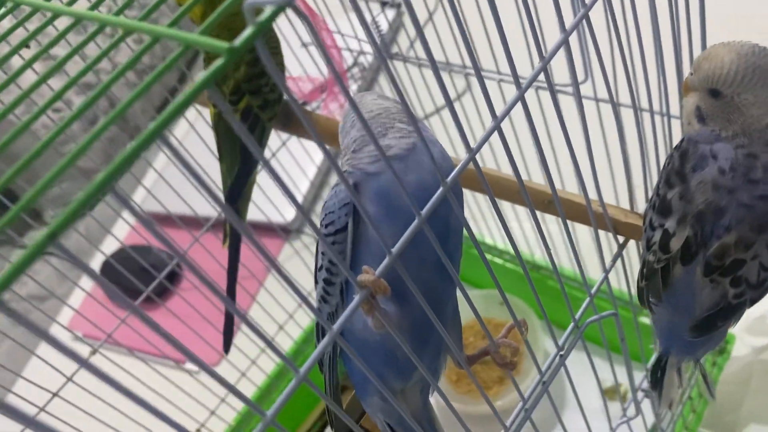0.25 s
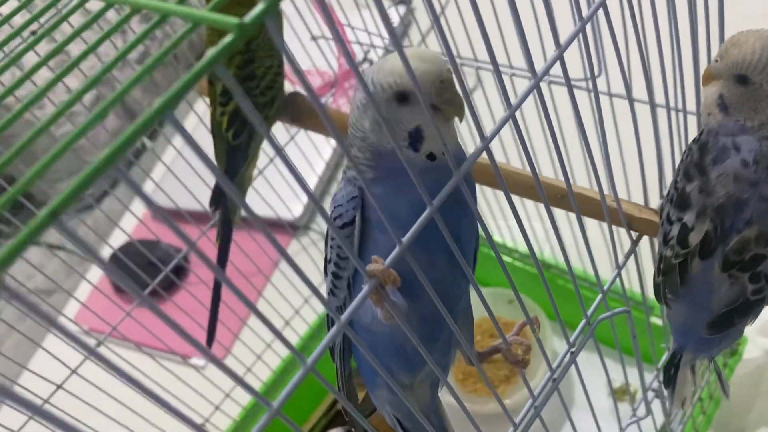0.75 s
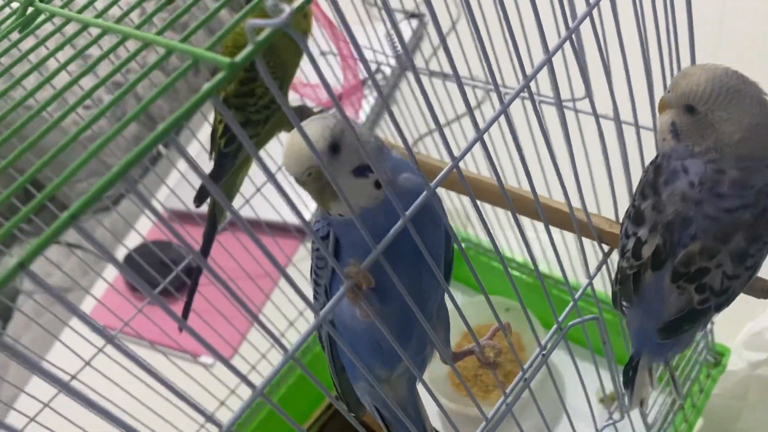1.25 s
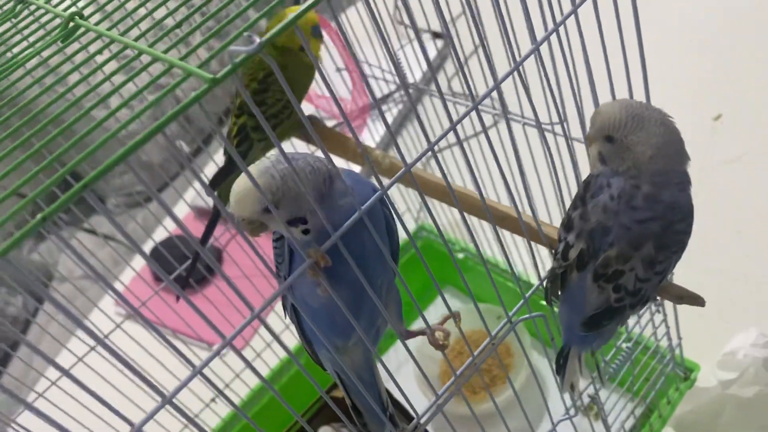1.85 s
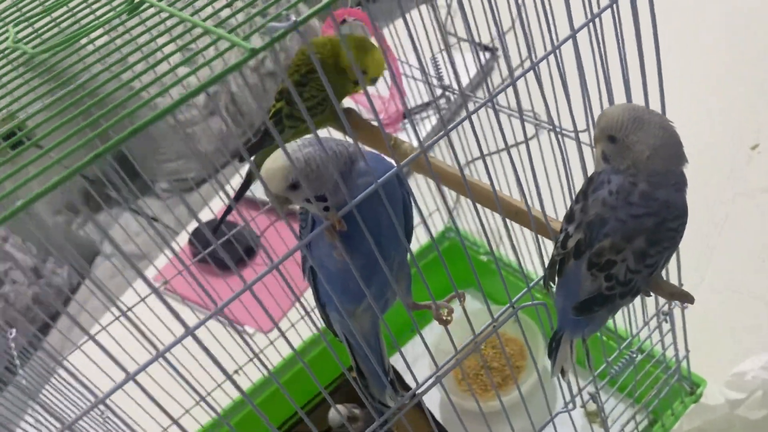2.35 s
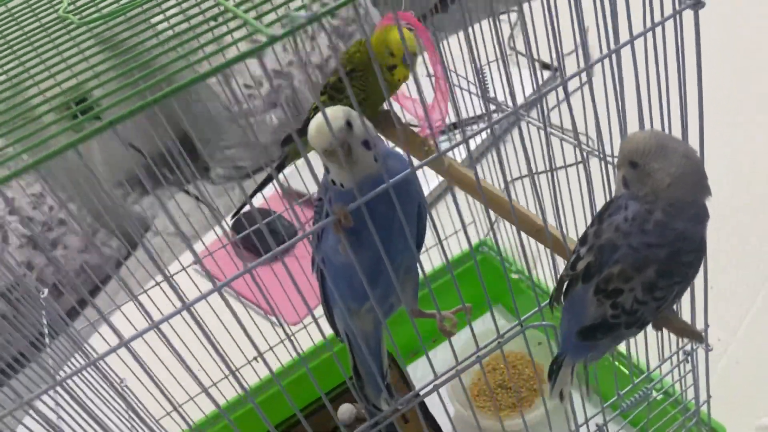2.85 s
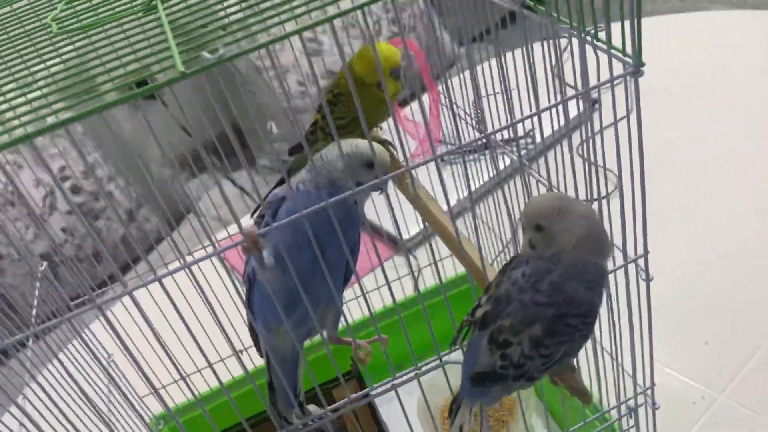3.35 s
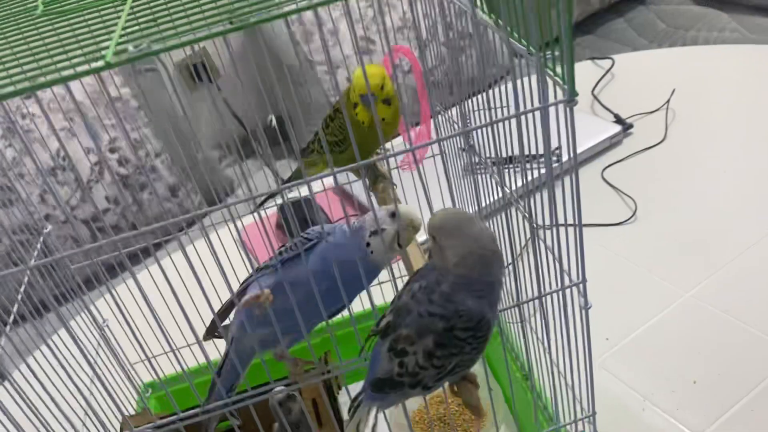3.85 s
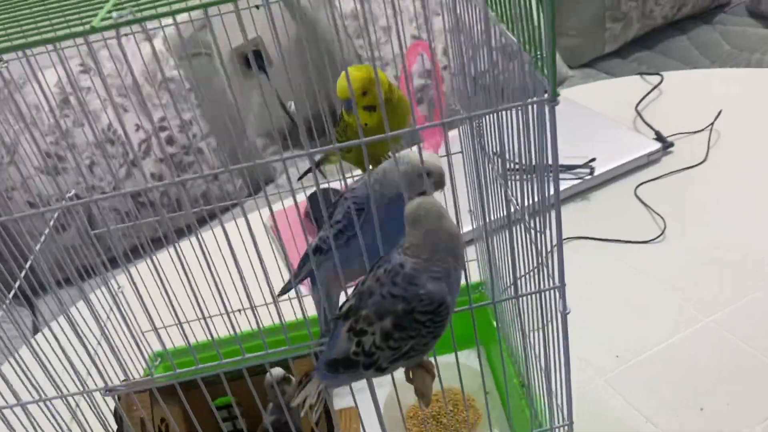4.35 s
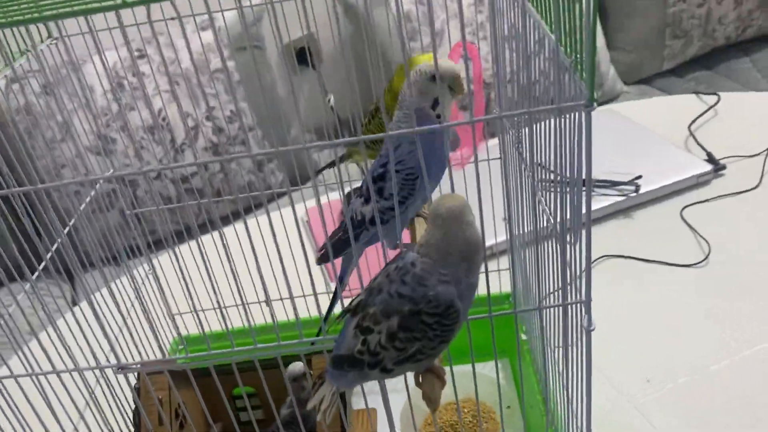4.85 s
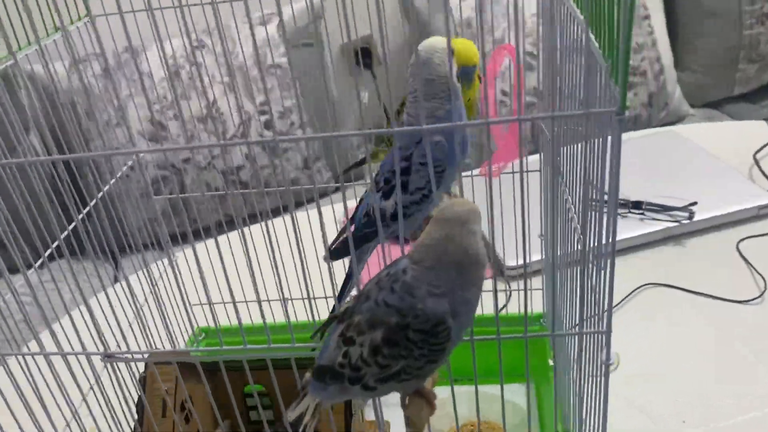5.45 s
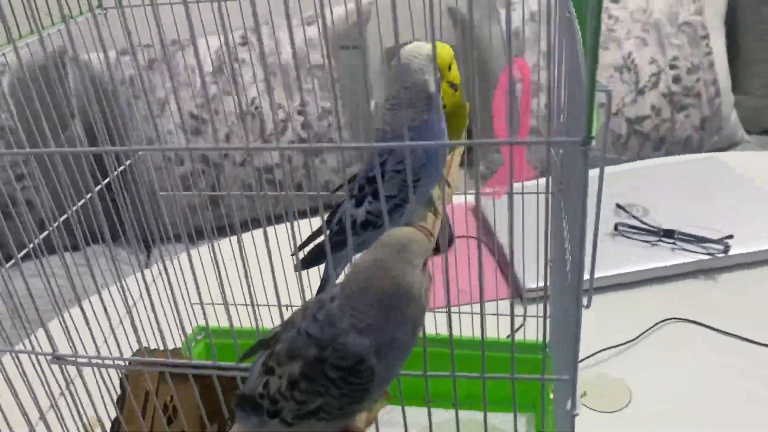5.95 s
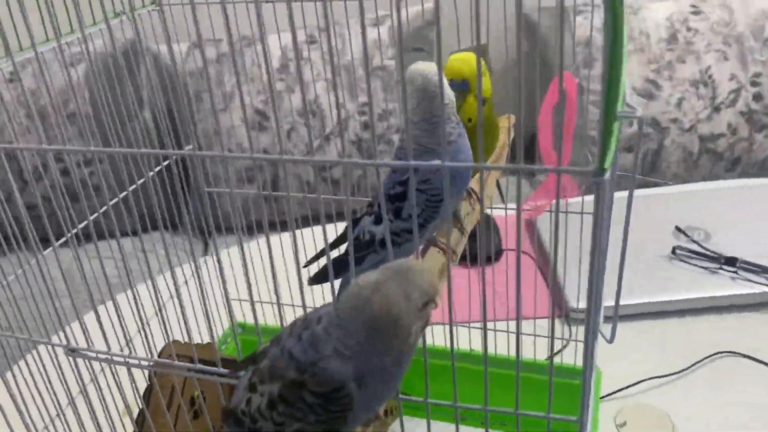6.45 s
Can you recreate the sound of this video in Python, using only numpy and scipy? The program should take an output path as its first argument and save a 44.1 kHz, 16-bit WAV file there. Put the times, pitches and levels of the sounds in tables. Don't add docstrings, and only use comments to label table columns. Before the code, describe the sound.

Budgerigars in a wire cage, heard close on a handheld phone. A tumble of short whistles is already under way, followed by hurried, level and loose chattering calls. After a quieter gap with a wooden knock, two bright tumbles lead to a soft warble and a run of rising chucks as handling rumble swells. A short call, late warble, rasps, beak scraping and a final tick follow in a softly ringing room.

```python
import sys
import numpy as np
from scipy import signal
from scipy.fft import rfft, irfft
from scipy.io import wavfile
from scipy.ndimage import uniform_filter1d

SR = 44100
rng = np.random.default_rng(int(sys.argv[2]) if len(sys.argv) > 2 else 0)


def boost(x):
    u = np.asarray(x, float) / 20
    return 10 ** u


def transcribe(signal):
    frames = np.atleast_2d(signal).T
    limited = np.clip(frames, -1, 1)
    pcm = np.round(limited * 32767).astype(np.int16)
    wavfile.write(sys.argv[1], SR, pcm)


N = 295470
T = np.arange(N) / SR


def band(x, hz, width_hz, order=2):
    lo = np.sqrt(hz ** 2 + width_hz ** 2 / 4) - width_hz / 2
    hi = min(lo + width_hz, .45 * SR)
    return signal.sosfilt(signal.butter(order, [lo, hi], "band", fs=SR, output="sos"), x)


def unit(x):
    return x / np.sqrt(np.mean(x ** 2))


def walk(rate):
    k = int(SR / rate)
    steps = np.repeat(rng.standard_normal(N // k + 1), k)
    return unit(uniform_filter1d(uniform_filter1d(steps, k), k)[:N])


def add(out, s, x):
    i = int(np.clip(s * SR, 0, N - 1))
    out[i:i + len(x)] += x[:N - i]


def swell(t, rise, fall):
    u = (np.arange(len(t)) + .5) / len(t)
    return np.sin(np.pi / 2 * np.clip(np.minimum(u / rise, (1 - u) / fall), 0, 1)) ** 2


def background():
    # frequency in Hz, level in dB per Hz
    air_colour = [(20, -12.0), (60, -2), (130, -4.5), (250, -7.5), (600, -9), (1000, -8.5), (3000, -31),
                  (6000, -46), (11000, -51)]
    # time in seconds, level in dB over rest
    stirring = [(0, 2), (2.25, 4), (2.9, 3), (3.3, 7.5), (3.62, 8.5), (3.8, 18.5), (4.1, 17.5), (4.5, 10.5),
                (5.2, 2), (5.6, 6), (6.0, 3.5), (6.3, 9.5), (6.7, 3.5)]
    # start in seconds, length in seconds, centre in Hz, level in dB
    drone_rows = [
        (4.14, 1, 603, -69.5),
    ]
    # frequency in Hz, level in dB
    mains_lines = [(60, -85.5), (118, -86.5)]

    stir = np.interp(T, *np.transpose(stirring))
    f = np.fft.rfftfreq(N, 1 / SR) + 1
    hz, db = np.transpose(air_colour)
    colour = boost(np.interp(np.log(f), np.log(hz), db))
    mid, side = irfft(rfft(rng.standard_normal((2, N))) * colour, N)
    air = mid + np.array([[.4], [-.4]]) * side
    rumble = unit(band(air, 120, 260)) * boost(-78 + stir + 1.9 * walk(7.1))
    hum = unit(band(air, 422.2, 700)) * boost(-78 + stir + 0.91 * walk(8.5))
    hiss = unit(band(air, 3000, 8100)) * boost(-77 + walk(5.6))
    rustle = unit(band(rng.standard_normal((2, N)), 2200, 5500, order=3))
    rustle *= boost(-89 + 1.15 * stir + 2.1 * walk(49))

    (s, length, hz, db), = drone_rows
    drone, t = np.zeros(N), np.arange(0, length, 1 / SR)
    add(drone, s, boost(db) * swell(t, 0.016, 0.89))
    drone *= unit(band(rng.standard_normal(N), hz, 30))
    mains = sum(boost(db + 2.0 * walk(2.4)) * np.sin(2 * np.pi * hz * T) for hz, db in mains_lines)
    microphone_hiss = boost(-97) * unit(band(rng.standard_normal((2, N)), 7500, 6000))
    return rumble + hum + hiss + rustle + drone + mains + microphone_hiss


def thumps():
    # start in seconds, peak in dB, frequency in Hz
    bumps = [
        (3.58, -55.5, 54.6),
        (3.76, -54.5, 179),
        (3.821, -49.5, 105),
        (4.02, -52.5, 65),
        (4.03, -54.5, 154),
    ]
    out = np.zeros(N)
    for s, db, hz in bumps:
        t = np.arange(0, 5.5 / hz, 1 / SR)
        add(out, s, boost(db) * swell(t, 0.28, 0.63) * np.sin(2 * np.pi * hz * t))
    return out


def ticks():
    # start in seconds, peak in dB, ring in Hz, time to fade by 60 dB in seconds
    wood = [
        (0.891, -49.5, 554, 0.012),
        (2.233, -28.5, 545, 0.028),
        (2.261, -61, 547, 0.022),
        (5.986, -49.5, 520, 0.015),
        (6.571, -44, 864, 0.022),
    ]
    # start in seconds, peak in dB
    wire = [
        (0.1672, -44),
        (2.4134, -48),
        (2.4224, -43),
        (2.6437, -45.5),
        (3.448, -38.5),
        (6.5727, -37),
    ]
    # start in
    # seconds, peak in dB
    clicked = [(5.740, -51), (5.745, -50), (5.751, -52), (5.757, -47), (5.764, -48), (5.880, -52.5),
               (5.884, -53), (5.889, -46), (5.902, -54), (5.908, -51), (5.914, -52), (5.919, -45),
               (5.925, -38.5), (5.931, -53), (5.934, -45.5), (5.938, -53), (5.942, -42), (5.946, -53)]
    out, t = np.zeros(N), T[:2000]
    for s, db, hz, t60 in wood:
        ring = np.sin(2 * np.pi * hz * t) * np.exp(-np.log(1000) * t / t60)
        add(out, s, boost(db) * ring * (1 - np.exp(-t / 0.001)))
    for s, db in wire:
        crack = rng.standard_normal(len(t)) * np.exp(-t / 0.00061)
        add(out, s, boost(db) * band(crack, 1600, 4900))
    for s, db in clicked:
        rub = (t == 0) + 0.18 * rng.standard_normal(len(t)) * np.exp(-t / 0.0021)
        bright = boost(-13) * band(rub, 3200, 2600, order=3)
        add(out, s, boost(db + 20) * (band(rub, 1100, 1400) + bright))
    return out


def rasps():
    # start in seconds, length in
    # seconds, pulses a second, centre pitch in Hz, level in dB
    bursting = [(2.419, 0.022, 1600, 3010, -64), (5.408, 0.089, 250, 4160, -55.5),
                (5.5, 0.44, 830, 352, -65.5), (5.556, 0.074, 640, 1635, -43),
                (5.559, 0.041, 400, 3983, -47.5), (5.624, 0.071, 260, 2130, -46),
                (6.07, 0.15, 1100, 1287, -66.5), (6.364, 0.03, 1700, 3930, -34),
                (6.365, 0.035, 1400, 1410, -40), (6.368, 0.011, 1700, 7950, -48),
                (5.558, 0.021, 900, 6420, -53)]
    swelling = [
        (0.46, 0.12, 654, 290, -69),
        (1.5, 0.061, 510, 4060, -55),
        (1.8423, 0.036, 420, 4480, -42),
        (4.706, 0.028, 859, 4850, -46.5),
        (4.695, 0.032, 740, 8000, -55.5),
        (2.69, 0.039, 2000, 8600, -61),
        (5.885, 0.16, 260, 1670, -64.5),
        (6.12, 0.34, 2000, 3900, -81.5),
    ]
    rows = [(*r, 0.14) for r in bursting] + [(*r, 0.29) for r in swelling]
    out = np.zeros(N)
    for s, length, rate, hz, db, peak in rows:
        t = np.arange(0, length, 1 / SR)[:SR // 3]
        chance = rng.standard_normal((900, 2))
        at = (np.cumsum(np.exp(0.5 * chance[:, 0])) - .6) * SR / rate
        inside = at < len(t)
        starts = np.zeros(len(t))
        starts[at[inside].astype(int)] = boost(2.2 * chance[inside, 1])
        gate = 0.11 + signal.lfilter([1], [1, -np.exp(-1 / (0.00079 * SR))], starts)
        puffs = gate * rng.standard_normal(len(t)) * swell(t, peak, 1 - peak) ** 0.59
        throat = band(np.pad(puffs, (0, 400)), hz, np.minimum(1.3 * hz, 2700), order=3)
        add(out, s, boost(db) * unit(throat))
    return out


def whistle(hz, over_db, step_db, third_db=0):
    phase = 2 * np.pi * np.cumsum(hz) / SR
    tone = np.sin(phase)
    for k in range(2, 6):
        overtone = boost(over_db + step_db * (k - 1) + third_db * (k == 3))
        tone += overtone * (k * hz < 10500) * np.sin(k * phase + k)
    return np.sqrt(2) * tone


def chucks():
    # start in seconds, peak in dB, top pitch in Hz, length in seconds, overtones in dB
    rising = [(3.777, -44, 1500, 0.0077, -27), (3.831, -38, 2252, 0.0091, -3),
              (3.881, -48.5, 1980, 0.0083, -1.5), (3.935, -39.5, 2206, 0.014, -2.5),
              (3.993, -39.5, 1950, 0.011, -4.5), (4.048, -35.5, 2293, 0.023, -4.5),
              (4.111, -44, 2440, 0.014, -4.5), (4.169, -38.5, 2076, .012, -4.5),
              (4.235, -39, 2140, 0.01, 3), (4.315, -34, 2370, 0.0127, -3), (4.38, -40.5, 2240, 0.0129, -2),
              (4.462, -40.5, 2200, 0.012, -4)]
    from_hz = 440
    out, snap = np.zeros(N), np.zeros(N)
    for s, db, top_hz, length, over_db in rising:
        t = np.arange(0, length, 1 / SR)
        risen = np.minimum(np.maximum(t / 0.011, t / length), 1)
        hz = top_hz - (top_hz - from_hz) * (1 - risen) ** 1.3
        add(out, s, boost(db) * swell(t, 0.25, 0.38) * whistle(hz, over_db, step_db=-1.5))
        add(snap, s + 0.0021, boost(db - 17) * np.exp(-t / .004))
    out = out * (1 + 0.29 * walk(1200))
    snap = band(snap * rng.standard_normal(N), 8000, 7000)
    return band(out, 2010, 3270, order=3) + boost(-34.0) * out + snap


def note(length, path_hz, over_db, zigzag=0, turn=0):
    t = np.arange(0, length + 0.006, 1 / SR)
    hz = np.interp(t / t[-1], np.linspace(0, 1, len(path_hz)), path_hz)
    zigzag_hz = 174 * (1 + 0.14 * np.tanh(turn))
    hz *= 1 + zigzag * signal.sawtooth(2 * np.pi * (zigzag_hz * t + turn), .3)
    return swell(t, .0045 / t[-1], .004 / t[-1]) * whistle(hz, over_db, step_db=-8.0, third_db=0)


def strokes():
    # seconds after its start, length in seconds, from Hz, to Hz, level in dB
    tumble = [
        (-.007, 0.004, 2130, 1930, -6.5),
        (.003, 0.015, 3028, 3360, -1),
        (.023, 0.0075, 3217, 3130, -9.5),
        (.032, 0.014, 1606, 1814, 0.5),
        (.047, 0.008, 3650, 3410, -0.5),
        (.058, 0.0077, 2410, 2530, 1),
        (.067, 0.012, 2448, 2790, -2),
        (.062, 0.016, 1814, 1770, -10),
        (.09, 0.0045, 2014, 2050, 1.5),
        (.094, 0.014, 1580, 1162, -8.5),
    ]
    # start in seconds, level in dB, pitch factor, stretch, tilt in dB per kHz (head turn)
    sung = [
        (2.653, -40, 1.01, 1.013, -0.5),
        (3.037, -38, 1.02, 0.99, 3),
    ]
    # start in seconds, length in seconds, top Hz, end Hz, level in dB
    arches = [
        (3.406, 0.066, 4380, 4080, -67.5),
        (3.621, 0.041, 4160, 3570, -51),
        (5.183, 0.068, 4000, 3800, -67.5),
        (5.25, 0.0267, 1957, 1500, -67),
        (6.655, 0.043, 4010, 3080, -62),
    ]
    arch_shape = [.84, .97, 1.0, .97, .93, .88]
    # start in seconds, length in seconds, from Hz, to Hz, level in dB Loose
    # chatter, then from 3.635 s a short level call
    chatter = [(0.903, 0.027, 3400, 3348, -49), (0.944, 0.0091, 2787, 2610, -49),
               (0.956, 0.012, 2864, 2700, -45.5), (0.984, 0.0031, 2774, 2564, -41.5),
               (0.996, 0.0051, 2480, 2512, -42), (1.005, 0.0051, 2007, 2030, -43.5),
               (1.006, 0.0037, 4297, 3920, -43), (1.021, 0.0031, 5260, 5260, -33),
               (1.03, 0.0045, 3640, 3880, -44), (1.034, 0.006, 3740, 4030, -45),
               (1.04, 0.0064, 4130, 3660, -45.5), (1.05, 0.0064, 3280, 3194, -40),
               (1.113, 0.004, 4610, 4700, -46.5), (1.12, 0.0036, 4566, 4240, -41.5),
               (1.125, 0.0053, 4270, 3940, -42), (1.131, 0.007, 3300, 3270, -38),
               (1.147, 0.009, 3183, 3214, -47), (1.155, 0.0036, 3393, 3540, -43.5),
               (3.635, 0.027, 2524, 2565, -38.5), (3.669, 0.003, 3030, 2890, -40.5),
               (3.68, 0.016, 3126, 2683, -37), (3.691, 0.0025, 3370, 3054, -34),
               (3.694, 0.0052, 2914, 3114, -35.5), (3.697, 0.012, 2608, 2673, -34.5),
               (3.717, 0.014, 2975, 3174, -44.5), (3.725, 0.0025, 4850, 5007, -37),
               (3.728, 0.0027, 1730, 1870, -40), (3.732, 0.004, 1900, 2220, -41.5),
               (3.732, 0.0072, 3900, 4360, -44)]
    hurried = [(0.351, 0.009, 2775, 2370, -41.5), (0.382, 0.006, 2303, 2633, -42.5),
               (0.391, 0.014, 2740, 3270, -35.5), (0.408, 0.007, 2860, 3190, -33.5),
               (0.416, 0.003, 2480, 2163, -31), (0.421, 0.007, 2266, 2590, -31),
               (0.426, 0.0065, 2694, 3355, -30), (0.432, 0.014, 3450, 3526, -23.5),
               (0.455, 0.0074, 2190, 2370, -37), (0.459, 0.009, 2930, 3098, -33.5),
               (0.465, 0.0051, 1770, 1520, -32), (0.468, 0.008, 1533, 2060, -34),
               (0.476, 0.006, 3607, 3623, -22), (0.485, 0.0023, 2800, 3040, -25.5),
               (0.487, 0.0077, 2576, 2394, -27), (0.497, 0.0037, 2596, 2450, -33.5),
               (0.502, 0.006, 2642, 2520, -30), (0.53, 0.008, 1400, 1015, -42),
               (0.524, 0.0072, 1519, 1517, -33.5), (4.641, 0.009, 2093, 2185, -41.5),
               (4.653, 0.011, 3210, 3206, -41.5), (4.662, 0.011, 3220, 2945, -46),
               (4.683, 0.0064, 2094, 1690, -36), (4.69, 0.00302, 1690, 1880, -34.5),
               (4.693, 0.0034, 1610, 1840, -35.5), (4.7, 0.006, 3266, 3010, -33),
               (4.706, 0.0115, 2592, 2115, -37), (4.709, 0.0065, 4616, 4800, -36.5),
               (4.716, 0.0083, 4410, 4390, -39.5), (4.72, 0.008, 2297, 2527, -35),
               (4.733, 0.0028, 2332, 2570, -44), (4.74, 0.011, 3660, 3710, -44.5),
               (4.754, 0.00321, 1923, 1880, -42.5)]
    level_calls = [(0.678, 0.029, 2810, 2733, -38.5), (0.704, 0.009, 2903, 3084, -29.5),
                   (0.713, 0.0042, 3005, 2800, -28.5), (0.719, 0.013, 2790, 3103, -28.5),
                   (0.736, 0.007, 2885, 3036, -25.5), (0.744, 0.004, 3860, 3750, -27),
                   (0.76, 0.0038, 3870, 3530, -34), (0.774, 0.004, 3350, 3580, -27.5),
                   (0.781, 0.004, 2490, 2230, -37), (0.786, 0.004, 2580, 2660, -33.5),
                   (0.789, 0.014, 1890, 1870, -43.5), (0.79, 0.006, 3820, 3470, -34),
                   (0.804, 0.0034, 2650, 2670, -32.5), (1.748, 0.024, 2654, 2580, -41),
                   (1.772, 0.0057, 3057, 3310, -33.5), (1.776, 0.0074, 2550, 2710, -34.5),
                   (1.787, 0.004, 2690, 2860, -32.5), (1.797, 0.013, 3380, 2826, -35.5),
                   (1.808, 0.0024, 2900, 3200, -28), (1.818, 0.0035, 2900, 2800, -36),
                   (1.826, 0.008, 2670, 2790, -37.5), (1.838, 0.0063, 2720, 2580, -35),
                   (1.844, 0.0035, 3770, 3800, -29.5), (1.845, 0.004, 1970, 1920, -38.5),
                   (1.85, 0.0025, 3150, 3010, -37.5), (1.852, 0.0062, 2080, 1778, -38),
                   (1.857, 0.0023, 2960, 3130, -38.5), (1.859, 0.005, 4095, 3645, -36),
                   (1.862, 0.0039, 1361, 1290, -38.5), (1.863, 0.007, 3617, 3950, -39.5),
                   (1.867, 0.0031, 1360, 1100, -45), (1.868, 0.006, 2670, 2716, -42)]
    warble = [(3.461, 0.013, 4070, 3320, -58), (3.472, 0.0058, 3340, 3450, -54),
              (3.48, 0.0046, 3390, 3100, -58.5), (3.484, 0.0077, 3360, 3660, -56.5),
              (3.491, 0.0057, 4080, 4340, -55.5), (3.5, 0.011, 4480, 4100, -56.5),
              (3.509, 0.004, 4050, 4150, -54), (3.522, 0.006, 4240, 3640, -56),
              (3.53, 0.0067, 4100, 4160, -59), (3.528, 0.0048, 3570, 3590, -51.5),
              (3.535, 0.0045, 3230, 2960, -58), (3.546, 0.008, 3030, 2970, -60),
              (3.556, 0.004, 3640, 4200, -58), (3.562, 0.024, 4530, 4110, -50.5),
              (3.582, 0.0064, 4000, 4200, -53), (3.584, 0.0043, 3740, 3540, -55),
              (3.592, 0.0035, 3730, 3680, -46), (3.595, 0.0037, 3160, 3040, -53),
              (3.601, 0.0076, 2620, 2770, -53), (3.608, 0.005, 2060, 2060, -57),
              (3.612, 0.004, 2800, 2700, -49.5), (3.623, 0.0061, 2160, 2080, -54),
              (5.253, 0.005, 3118, 3400, -54), (5.278, 0.0038, 3665, 3550, -48.5),
                   (5.291, 0.0076, 3174, 3377, -49.5), (5.299, 0.0037, 2420, 2730, -50.5),
                   (5.301, 0.0041, 3260, 3300, -50.5), (5.344, 0.011, 3460, 2680, -54.5),
                   (5.362, 0.012, 2590, 2440, -54), (5.373, 0.0042, 2490, 2790, -51),
                   (5.378, 0.0061, 2410, 2060, -48.5), (5.383, 0.0084, 2127, 2400, -46.5),
                   (5.394, 0.0055, 3330, 3600, -51), (5.398, 0.0043, 2667, 3020, -46),
                   (5.406, 0.0042, 2620, 3290, -43.5), (5.414, 0.0043, 2500, 2576, -42.5),
                   (5.416, 0.004, 5033, 5080, -44), (5.419, 0.003, 2570, 2200, -48),
                   (5.423, 0.004, 3330, 3290, -42), (5.428, 0.0037, 3970, 4110, -48),
                   (5.436, 0.0055, 3450, 3450, -44), (5.964, .003, 3517, 3170, -52),
                   (6.014, 0.0074, 3236, 3500, -59)]
    flicks = [
        (0.039, .011, 4403, 3397, -44),
        (0.063, 0.011, 4006, 4060, -43),
        (0.793, 0.0088, 1730, 1051, -43.5),
        (0.992, 0.0043, 5120, 3900, -47),
        (0.999, 0.003, 5700, 4780, -41),
        (1.016, 0.0041, 4263, 5175, -43),
        (1.062, 0.0032, 3370, 4060, -50),
        (5.284, 0.018, 1796, 1390, -62),
        (1.14, 0.0028, 3325, 4260, -48),
        (5.406, 0.0055, 5850, 5340, -42.5),
    ]
    accents = [
        (.055, .022, 2510, 2557, -36.5),
        (1.049, 0.014, 6350, 6270, -54),
        (1.129, 0.017, 6140, 6560, -50.5),
        (1.745, 0.025, 7900, 7900, -51.5),
        (1.777, 0.071, 8500, 8096, -49),
        (3.657, 0.026, 9000, 8790, -49.5),
    ]
    loose = [(0, 0.0074, 3150, 3110, -37.5), (0.015, .012, 3130, 3030, -44.5),
             (.026, 0.0047, 2890, 2030, -43), (.031, .017, 1925, 1740, -39),
             (.049, 0.006, 3300, 2890, -38.5), (.07, 0.0033, 2980, 3100, -39),
             (.078, 0.008, 2494, 2420, -38), (.09, 0.011, 1860, 1400, -46.5),
             (.093, 0.01, 3470, 2930, -42.5), (.106, 0.009, 3880, 3340, -47),
             (1.427, 0.004, 2000, 2130, -56.5), (1.435, .022, 3230, 3398, -48),
             (1.463, .006, 2075, 1480, -50), (1.471, 0.0037, 1960, 1970, -44.5),
             (1.477, 0.0055, 3220, 3330, -43), (1.485, 0.014, 2330, 2600, -51.5),
             (1.511, 0.0067, 2310, 2030, -48), (1.524, .005, 2135, 2060, -44),
             (1.527, .011, 1590, 1190, -49.5)]

    rows = []
    for s, db, pitch, stretch, tilt in sung:
        for at, length, a, b, note_db in tumble:
            loudness = db + note_db + tilt * (a - 2500) / 1000
            rough = at / .12
            rows.append((s + at * stretch, length * stretch, [a * pitch, b * pitch], loudness, rough))
    for s, length, top, end, db in arches:
        rows.append((s, length, [top * share for share in arch_shape] + [end], db, .65))
    for s, length, a, b, db in chatter + hurried + level_calls + warble + flicks + accents + loose:
        rows.append((s, length, [a, b], db, .7 - length / 0.04))
    return [(np.maximum(s, 0), length + np.minimum(s, 0), path, db, np.clip(rough, 0.36, 1))
            for s, length, path, db, rough in rows if s + length > .004]


def song():
    lead_s = .0035
    clean, strained, effort = np.zeros(N), np.zeros(N), np.zeros(N)
    for s, length, path, db, rough in strokes():
        c = rng.standard_normal(7)
        path = np.array(path) * (1 + .004 * c[4])
        db = db + .5 * c[5]
        over_db = -10.5 - 3 * (np.mean(path) - 2500) / 1000 + 0.5 * c[6]
        over_db = np.minimum(over_db, -11.5) + 0.19 * np.minimum(db + 34.0, 0)
        stroke = boost(db) * note(length, path, over_db + 2.5, .075 * rough ** 3, c[3])
        strain = rough * np.minimum(boost(0.18 * over_db), 1)
        add(clean, s - lead_s, stroke)
        add(strained, s - lead_s, strain * stroke)
        add(effort, s, strain * np.abs(stroke))
        other = path[-1] * (1 + 0.28 * np.tanh(c[0]))
        second = note(0.0036, [other, other * (1 + 0.076 * c[3])], over_db)
        add(clean, s + length * (.7 + 0.42 * c[1]), strain * boost(db - 3.5 + 2 * c[2]) * second)
    air = unit(band(rng.standard_normal(N), 3200, 1900))
    air += boost(-18.0) * unit(band(rng.standard_normal(N), 5800, 3500))
    air *= boost(-10.5) * uniform_filter1d(effort, size=200) * boost(5.5 * walk(500))
    voice = clean + strained * (.85 * walk(600) + .35 * walk(2200))
    i = np.arange(N)
    voice = np.interp(i + 1.4 * walk(250), i, voice)
    return band(voice * boost(1.2 * walk(200)) + air, 3200, 9500)


def room(x):
    # centre in Hz, time to fade by 60 dB in seconds, level in dB
    tail_bands = [(576, 0.15, -12), (1690, 0.43, -9), (3134, 0.25, -1.5), (7840, 0.18, -3)]
    # delay in seconds, left level in dB, right level in dB
    near_walls = [(.0031, -13, -14), (.0072, -13, -15), (0.013, -16, -14)]
    t = T[:SR // 2]
    noise = rng.standard_normal((3, len(t)))
    noise = (0.59 * noise[0] + 0.81 * noise[1:]) * (1 - np.exp(-(t / .018) ** 2))
    tail, walls = np.zeros((2, len(t))), np.zeros((2, len(t)))
    for hz, t60, db in tail_bands:
        fading = band(noise, hz, 1.257 * hz) * np.exp(-np.log(1000) * t / t60)
        tail += boost(db) * fading / np.sqrt(np.sum(fading ** 2) / 2 * SR / 2 / hz)
    for delay, left_db, right_db in near_walls:
        walls[0, int(delay * SR)] = boost(left_db)
        walls[1, int(delay * 1.07 * SR)] = boost(right_db)
    i = np.arange(N)
    smeared = [np.interp(i + 4.5 * walk(80) + 2.5 * walk(330), i, wet[:N])
               for wet in signal.fftconvolve(x[None], tail, axes=1)]
    return signal.fftconvolve(x[None], walls, axes=1)[:, :N] + smeared


def scene():
    # time in seconds, birds left minus right in dB
    swing = [(0, 2.5), (.8, 1.5), (1.8, 1.5), (2.6, 0.5), (4.2, 0), (6.7, -0.5)]
    # frequency in Hz, left minus right in dB
    port_shade = [(300, -0.5), (1100, -4), (2800, 2.5), (5500, 1), (9000, -5)]
    far, close, rough = song(), chucks() + ticks(), rasps()
    birds = far + close + rough
    direct = np.array([birds, np.roll(birds, 2)]) * boost(0.5)
    sound = direct + room(far + boost(-3.0) * close + boost(-1.0) * rough)
    lean = np.interp(T, *np.transpose(swing)) / 2
    sound = sound * boost([lean, -lean])
    f = np.fft.rfftfreq(N, 1 / SR) + 1
    hz, db = np.transpose(port_shade)
    shade = np.interp(np.log(f), np.log(hz), db) / 2
    return irfft(rfft(sound + background() + thumps()) * boost([shade, -shade]), N)


def top_cut(x):
    return signal.sosfilt(signal.butter(12, 10760, fs=SR, output="sos"), x)


def record(dry):
    cut = signal.sosfilt(signal.butter(6, 9500, fs=SR, output="sos"), dry)
    return top_cut(cut)


dry = scene()
out = record(dry)
transcribe(out)
```